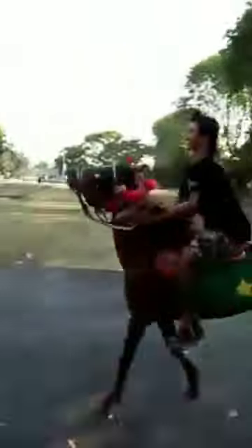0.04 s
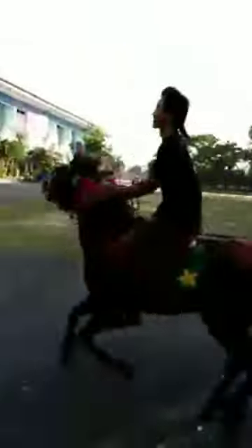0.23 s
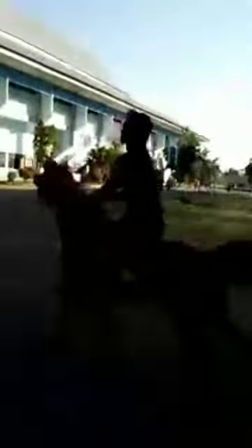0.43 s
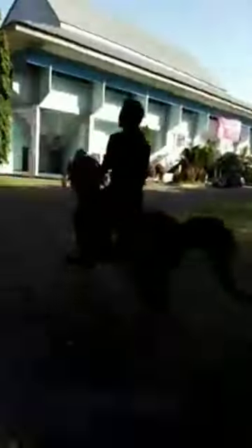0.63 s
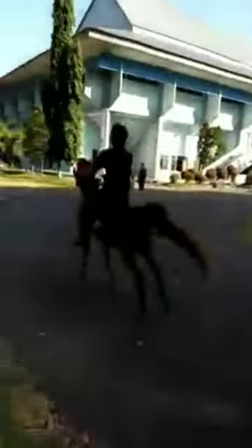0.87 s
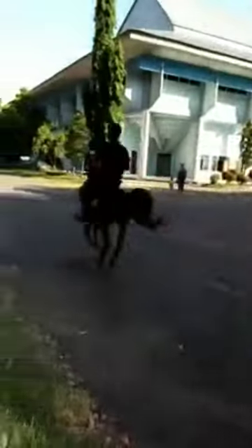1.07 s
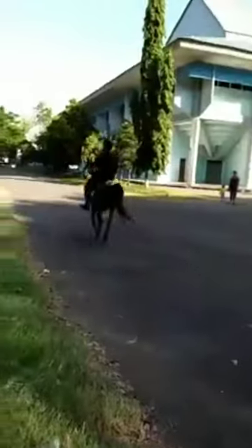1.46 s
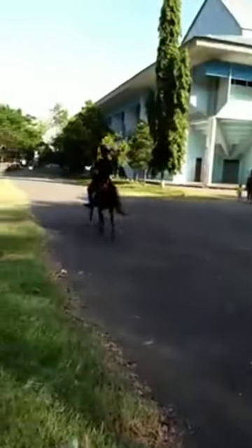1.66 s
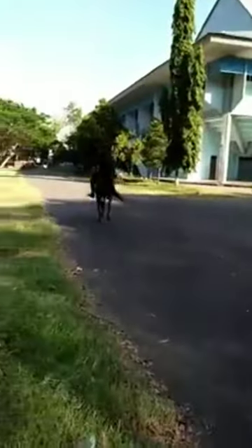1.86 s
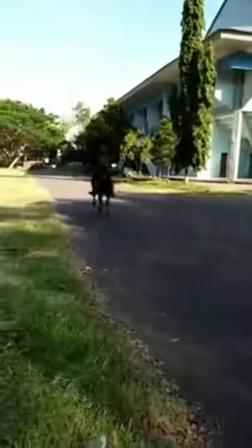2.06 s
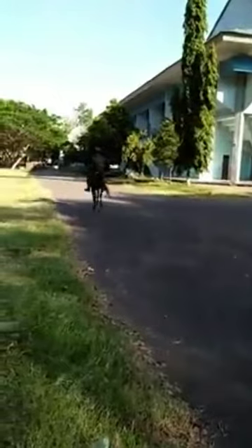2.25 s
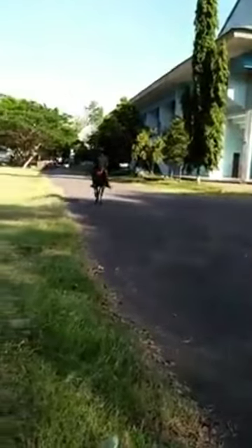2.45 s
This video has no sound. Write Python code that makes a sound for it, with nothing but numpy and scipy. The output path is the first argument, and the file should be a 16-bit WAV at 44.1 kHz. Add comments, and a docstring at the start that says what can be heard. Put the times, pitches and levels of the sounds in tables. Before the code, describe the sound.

A horse canters close past on asphalt, its hooves clopping in quick uneven groups with gritty scuffs. The hoofbeats fade as it moves away, echoing faintly outdoors, while light wind rumbles on the microphone.

```python
"""On an asphalt road, a horse canters close past and away. Each hoof lands in a few quick contacts
(heel, toe, a skip) that ring its hollow horn and crush grit; some hooves scuff along the road.
Buildings and trees answer faintly, and gusts rumble on a nearly mono microphone."""
import sys
import numpy as np
from scipy import signal
from scipy.fft import rfft, irfft, next_fast_len
from scipy.io import wavfile
from scipy.ndimage import uniform_filter1d, map_coordinates

SR = 44100
rng = np.random.default_rng(int(sys.argv[2]) if len(sys.argv) > 2 else 0)


def waveform_to_disk(signal):
    """Save audio, clipped to [-1, 1], as 16-bit WAV at the path in sys.argv[1]."""
    frames = np.transpose(np.atleast_2d(signal))
    scaled = np.clip(frames, -1, 1) * 32767
    samples = np.round(scaled).astype(np.int16)
    wavfile.write(sys.argv[1], SR, samples)


N = 114660


def amp(db):
    """Decibels to gain."""
    return 10 ** (np.asarray(db) / 20)


def unit(x):
    """Scale to rms 1."""
    return x / np.sqrt(np.mean(x ** 2) + 1e-20)


def along(points, hz):
    """Read (Hz, value) points on a log frequency axis."""
    freqs, values = np.transpose(points)
    return np.interp(np.log(hz + 1), np.log(freqs + 1), values)


def curve(rows):
    """Automation: (seconds, value) points to one value per sample."""
    return np.interp(np.arange(N) / SR, *np.transpose(rows))


def filtered(x, response):
    """Equalise x with a gain given as a function of frequency."""
    size = next_fast_len(N + SR // 2)
    return irfft(rfft(x, size) * response(np.fft.rfftfreq(size, 1 / SR)), size)[..., :N]


def noise(spectrum):
    """Noise of rms 1, coloured by (Hz, dB) points."""
    return unit(filtered(rng.standard_normal(N), lambda hz: amp(along(spectrum, hz))))


def fade(t, t60):
    """Exponential decay, 60 dB down after t60 seconds."""
    return np.exp(-np.log(1000) * t / np.maximum(t60, 1e-3))


def add(track, start, sound):
    """Mix a sound into the track at start seconds."""
    part = track[max(round(start * SR), 0):][:len(sound)]
    part += sound[:len(part)]


def grainy(x, grains_per_s=700, spread_db=4.5):
    """Break a noise into grains of random strength."""
    strengths = map_coordinates(rng.standard_normal(N), [np.arange(N) * grains_per_s / SR], order=1)
    return unit(x * amp(spread_db * strengths))


def strokes(rows, rise_s=0.0058, fall_db=16.5):
    """Envelope of slides from (start, length, dB) rows: a quick rise, then a rounded fall."""
    envelope = np.zeros(N)
    t = np.arange(SR // 4) / SR
    for start, length, db in rows:
        add(envelope, start, (1 - np.exp(-t / rise_s)) * amp(db - fall_db * (t / length) ** 2))
    return envelope


def ringing(modes, t, detune, pitch=1):
    """Damped modes whose level, tuning and phase differ at every blow."""
    ring = np.zeros(len(t))
    for (freq, db, t60), force, drift, phase in zip(modes, *rng.standard_normal((3, len(modes)))):
        hz = pitch * freq * (1 + detune * drift)
        ring += amp(db + 2 * force) * np.sin(2 * np.pi * (hz * t + phase)) * fade(t, t60)
    return unit(ring)


def air():
    """A soft bed of outdoor noise."""
    # Each row: frequency in Hz, level in dB.
    colour = [(30, -15), (150, -0.5), (280, 5), (380, -8), (700, -4), (1300, 3), (2800, -6), (4200, -20.5),
              (6000, -26), (10000, -23.5), (15000, -27.5)]
    # Each row: time in seconds, level in dB before the trim.
    levels = [(0.0, -43.5), (0.57, -55.5), (1.11, -57.5), (1.76, -56.5), (1.87, -50), (2.23, -58.5),
              (2.48, -58.5), (2.6, -64)]
    return amp(curve(levels) - 4.5) * noise(colour)


def wind():
    """Gusts rumble on the microphone."""
    # Each row: time in seconds, level in dB.
    gusts = [(0.0, -66), (0.05, -71), (0.11, -48.5), (0.29, -64), (0.3, -58), (0.49, -61), (0.53, -43),
             (0.56, -56), (0.59, -42), (0.75, -60), (0.81, -39.5), (0.91, -41), (0.93, -30.5),
             (0.98, -40.5), (1.1, -33), (1.22, -53.5), (1.36, -49), (1.43, -40), (1.53, -47), (1.57, -47.5),
             (1.6, -53), (1.64, -52.5), (1.77, -56.5), (1.82, -42), (1.86, -45.5), (1.88, -67), (2.01, -57),
             (2.08, -68), (2.16, -48), (2.27, -53), (2.35, -40), (2.38, -48), (2.43, -40), (2.48, -46.5),
             (2.56, -37), (2.6, -42.5)]
    # Each row: frequency in Hz, level in dB.
    rumble = [(20, -27), (40, -10.5), (52, 1.5), (63, 3), (80, -3.5), (115, -6), (150, -11), (220, -22),
              (300, -24), (400, -34), (800, -74)]
    return amp(curve(gusts)) * noise(rumble)


def reflections(horse, wetter_db_per_s=6):
    """Walls and trunks return scatter, echoes and a faint tail; the mix gets wetter as the horse recedes."""
    # Decay of the tail. Each row: frequency in Hz, t60 in seconds.
    decay = [(200, 1), (1500, 0.46), (3000, 0.3), (6000, 1), (13000, 0.9)]
    hz, t, spectrum = signal.stft(rng.standard_normal(SR), SR, nperseg=256)
    tail = signal.istft(spectrum * fade(t, along(decay, hz)[:, None]), SR, nperseg=256)[1][:SR]
    scatter = rng.standard_normal(SR) * fade(np.arange(SR) / SR, t60=0.05)
    delays_s = rng.uniform(0.016, 0.11, size=7)
    echoes = np.bincount((delays_s * SR).astype(int), 1 / delays_s, SR)  # later ones are weaker
    echoes = uniform_filter1d(echoes, size=5)  # soften their top end
    response = sum(amp(db) * part / np.linalg.norm(part)
                   for db, part in [(-26.5, tail), (-21, scatter), (-33.5, echoes)])
    send = amp(wetter_db_per_s * np.arange(N) / SR)
    return signal.fftconvolve(horse * send, response)[:N]


def grit():
    """Crushed grit: bright, grainy noise."""
    # Each row: frequency in Hz, level in dB.
    colour = [(1500, -43.5), (3000, 0.5), (4500, 0), (6000, -2.5), (8000, -7), (10000, -4.5),
              (13000, -19.5), (15500, -30)]
    return grainy(noise(colour))


def rubs():
    """Soft, low rubs between the steps."""
    # Each row: start in seconds, length in seconds, level in dB.
    slides = [(.048, 0.027, -45.5), (.178, 0.06, -42), (.399, 0.0042, -25), (.511, 0.012, -44.5),
              (.56, 0.015, -46.5)]
    # Each row: frequency in Hz, level in dB.
    colour = [(200, -29.5), (450, -0.5), (600, 5), (900, -2), (1300, -12), (2500, -33.5)]
    return strokes(slides) * noise(colour)


def scrapes():
    """A dragging hoof makes a thin, bright scrape."""
    # Each row: start in seconds, length in seconds, level in dB.
    drags = [(.422, 0.038, -40), (.503, 0.025, -58)]
    # Each row: frequency in Hz, level in dB.
    colour = [(7000, -19.5), (11500, -16.5), (12500, 7), (13300, -3.5), (14500, -13.5)]
    return strokes(drags) * grainy(noise(colour))


def scuffs():
    """A sliding hoof rasps on the road and sprays hissing grit."""
    # Each row: start in seconds, length in seconds, rasp in dB, hiss in dB.
    slides = [(0.093, 0.024, -42, -42), (0.115, 0.034, -31, -41), (0.168, 0.033, -36, -73),
              (0.198, 0.015, -34, -59), (0.22, 0.019, -33, -46), (0.276, 0.051, -45.5, -56.5),
              (0.418, 0.046, -44, -49), (0.546, 0.032, -38.5, -45.5), (0.627, 0.063, -32, -45.5),
              (0.704, 0.065, -49, -60), (0.837, 0.039, -38, -47), (0.986, 0.021, -43.5, -47.5),
              (1.058, 0.12, -50.5, -75), (1.387, 0.043, -45.5, -50), (1.514, 0.034, -44, -75),
              (1.815, 0.05, -39, -46), (1.951, 0.051, -46, -58), (2.243, 0.046, -41.5, -58),
              (2.36, 0.053, -46.5, -62)]
    # Each row: frequency in Hz, level in dB.
    rasp_colour = [(300, -74), (800, 1), (1200, -2.5), (1700, 2), (2200, 2.5), (2900, -3.5), (4200, -28.5),
                   (8000, -13)]
    rasp = strokes([(start, length, db) for start, length, db, _ in slides]) * grainy(noise(rasp_colour))
    hiss = strokes([(start, length, db) for start, length, _, db in slides]) * grit()
    return rasp + hiss


def thuds(peak_s=0.0006, hz=300):
    """The weight of the heaviest steps thumps the road."""
    # Each row: start in seconds, envelope peak in dB.
    steps = [(0.5309, -20.5), (.954, -26.5), (1.387, -42.5), (1.834, -38.5)]
    track = np.zeros(N)
    t = np.arange(SR // 20) / SR
    thud = t / peak_s * np.exp(1 - t / peak_s) * np.cos(2 * np.pi * hz * t)
    for start, db in steps:
        add(track, start, amp(db) * thud)
    return track


def hooves(attack_s=0.00061, push_s=0.00079, brush_lead_s=0.0084, knock_db_per_s=4):
    """Each contact brushes and strikes the road, rings the hoof's hollow, wall and rim, and cracks grit."""
    # Each row: start in seconds, hollow pitch in Hz, wall pitch in Hz, relative levels of clop,
    # clack and grit in dB, ring time of the hollow in seconds.
    contacts = [(0.1016, 1432, 2430, -13.5, -21.5, -37, 0.023),
                (0.1059, 1495, 2590.0, -19, -19, -31, 0.033),
                (0.1219, 1660, 3170.0, -26.0, -30.0, -33, 0.023),
                (0.1296, 1520.0, 2980.0, -26.5, -29, -34.5, 0.03),
                (0.227, 1456, 2695, -20.0, -22.5, -30.0, 0.02),
                (0.347, 1520, 2850.0, -43.5, -47, -50.5, 0.034),
                (0.3547, 1560, 2260, -33, -35.5, -39.5, 0.036),
                (0.407, 1444, 2910, -11.5, -28.0, -36.5, 0.017),
                (0.4213, 1360, 2850, -28.5, -50.0, -50, 0.022),
                (0.52, 1790, 2650, -19.5, -24.5, -32.5, 0.014), (0.5269, 1510, 3090, -21, -25, -44, 0.014),
                (0.5315, 1405, 2550, -12, -20.5, -35, 0.017), (0.6288, 1594, 2460, -25, -27.5, -35, 0.026),
                (0.6356, 1340, 2454, -21.5, -24.5, -42.5, 0.025),
                (0.6465, 1460, 2610.0, -31, -28, -65, 0.054), (0.6601, 1570, 2480, -32, -32.5, -60, 0.03),
                (0.757, 1340, 2770, -40, -56, -59, 0.024), (0.7637, 1427, 2580, -38.5, -46.5, -52.5, 0.026),
                (0.8444, 988, 2610, -33.5, -54, -57, 0.022), (0.8495, 1440, 2215, -33, -30.5, -39.5, 0.014),
                (0.8539, 1280, 2400, -36.5, -32.5, -53, 0.016), (0.8665, 1355, 2580, -32, -40, -58, 0.024),
                (0.9459, 1410, 2460, -31, -25.5, -34, 0.024),
                (0.9536, 1446, 2755, -23, -28.5, -31.5, 0.019),
                (0.9576, 1426, 2595, -31.5, -24.0, -45, 0.028),
                (1.0587, 1350, 2520, -31, -36.5, -43.5, 0.0085),
                (1.0627, 1310, 2210, -34, -31, -44.5, 0.014),
                (1.0728, 1350, 2270, -24, -42.0, -55.0, 0.011),
                (1.0896, 1330, 2280, -32.0, -54, -58, 0.013),
                (1.2805, 1090, 2450, -22.5, -31.5, -51, 0.009),
                (1.2831, 1380, 2606, -28.5, -27, -42.0, 0.012),
                (1.2931, 1160, 2010, -32.5, -30.5, -61, 0.017),
                (1.3785, 1040, 2400.0, -33.5, -34.5, -45, 0.013),
                (1.3869, 1410, 2424, -24, -26.5, -40.5, 0.011), (1.3903, 1230, 2520, -28, -34, -46, 0.012),
                (1.4963, 1450, 2420.0, -36, -37, -50.5, 0.0072),
                (1.4985, 1286, 2420, -33.5, -39.0, -52.5, 0.0068),
                (1.5146, 1340, 2850, -43, -51, -76, 0.012), (1.613, 1156, 2470, -35.5, -69, -72, 0.021),
                (1.724, 1453, 3160, -32, -33, -45, 0.019), (1.7266, 1500, 2860, -30, -30, -41, 0.018),
                (1.7392, 1350, 2800, -40.0, -41, -55, 0.015), (1.819, 1760, 2690, -47, -47, -59.0, 0.015),
                (1.8282, 1640, 2780, -31, -31, -50, 0.012),
                (1.8342, 1646, 2670.0, -28.5, -29.5, -40.5, 0.019),
                (1.9287, 1500, 2520, -35.5, -32, -39, 0.0084),
                (1.9454, 1644, 2710, -36.5, -36, -52.0, 0.025), (1.9528, 1500, 2510, -47, -44, -56.0, 0.02),
                (2.039, 970, 2620, -46.5, -61, -62, 0.022), (2.045, 1260, 3060, -44.5, -52.5, -66.0, 0.012),
                (2.1592, 1436, 2626, -34, -28.5, -52, 0.022),
                (2.1638, 1420.0, 2730, -56, -41.0, -48.5, 0.02), (2.1778, 1440, 2660, -46, -45, -54, 0.01),
                (2.2547, 1630, 2930, -30.5, -39.5, -45, 0.009),
                (2.2653, 1580, 2560, -35.5, -42.0, -46, 0.016),
                (2.3687, 1550.0, 2390.0, -49.5, -43.5, -68, 0.014),
                (2.4534, 1464, 2300, -53, -52.5, -69, 0.012)]
    # The hollow's clop. Each row: pitch multiple, level in dB, t60 as a share of the ring time.
    hollow_modes = [(.79, -6.5, 0.65), (.98, 1.5, 0.66), (1.16, -2.5, 0.55)]
    # The hard wall's clack. Each row: pitch multiple, level in dB, t60 in seconds.
    wall_modes = [(.83, 0.5, 0.011), (1, 3.5, 0.018), (1.15, -5.5, 0.017), (1.3, -12, 0.017)]
    # The rim's high partials. Each row: frequency in Hz, level in dB, t60 in seconds.
    rim_modes = [(4042, 0.5, 0.048), (5114, -3.5, 0.033), (6460, -9.5, 0.0085), (9380, -6, 0.018),
                 (12730, -5, .02)]
    # The road's dull crunch. Each row: frequency in Hz, level in dB.
    knock_colour = [(100, -26.5), (400, -18), (550, -16), (750, -3.5), (1000, 3.5), (1700, 1.5),
                    (2200, -3.5), (3200, -17), (4200, -38)]
    ring, knock_envelope, crack_envelope = np.zeros((3, N))
    t = np.arange(SR // 20) / SR
    rise = 1 - np.exp(-t / attack_s)
    push = (1 - t / push_s) * t / push_s * np.exp(1 - 2 * t / push_s)  # one pressure swing
    brush = (t < brush_lead_s) * fade(np.abs(brush_lead_s - t), t60=0.013)  # swells into the landing
    for start, hollow_hz, wall_hz, clop_db, clack_db, grit_db, ring_s in contacts:
        clop = np.zeros(len(t))
        for k, (ratio, db, share) in enumerate(hollow_modes):
            polarity = (-1) ** (k + 1)
            clop += polarity * amp(db) * np.sin(2 * np.pi * hollow_hz * ratio * t) * fade(t, ring_s * share)
        clack = amp(clack_db - 10) * ringing(wall_modes, t, detune=0.021, pitch=wall_hz)
        rim = amp(grit_db - 11) * ringing(rim_modes, t, detune=0.062)
        add(ring, start, amp(clop_db + 9.5) * clop + amp(clop_db - 3.5) * push + rise * (clack + rim))
        knock_db = clop_db - 6.5 + knock_db_per_s * start  # later steps have more crunch for their clop
        add(knock_envelope, start, amp(knock_db) * rise * fade(t, t60=0.029))
        add(knock_envelope, start - brush_lead_s, amp(clop_db - 10.5) * brush)
        add(crack_envelope, start, amp(grit_db + 6.5) * rise * fade(t, t60=0.026))
    return ring + knock_envelope * noise(knock_colour) + crack_envelope * grit()


def scene(away_s=0.8):
    """Horse, reflections, wind and air; the treble of the mix is notched once the horse is far."""
    # Each row: frequency in Hz, gain in dB.
    far_colour = [(3000, 0.5), (3450, -0.5), (3950, -22), (4250, -15), (4800, -2), (5700, -3.5), (6600, 0),
                  (7800, -18), (8800, -2), (10200, -4), (11500, -15.5), (12600, -4.5), (14300, -8),
                  (15500, -25)]
    # Only the treble has a little width. Each row: frequency in Hz, side over mid in dB.
    width = [(100, -57), (2500, -73), (4500, -30.5), (9000, -13.5), (15000, -21)]
    horse = hooves() + thuds() + scuffs() + scrapes() + rubs()
    near = horse + reflections(horse) + wind() + air()
    far = filtered(near, lambda hz: amp(along(far_colour, hz)))
    crossfade = curve([(away_s - 0.1, 0), (away_s, 1)])
    mid = near + (far - near) * crossfade
    side = filtered(mid, lambda hz: 1j * amp(along(width, hz)))  # a quarter cycle out of phase
    return np.array([mid + side, mid - side])


def record(dry, top_hz=15450):
    """A steep low-pass keeps nothing above the recorder's band limit."""
    return filtered(dry, lambda hz: 1 / np.sqrt(1 + (hz / top_hz) ** 160))


dry = scene()
out = record(dry)
waveform_to_disk(out)
```